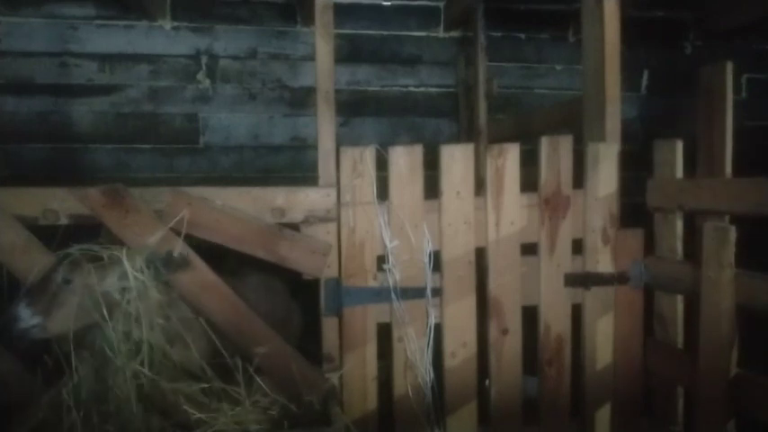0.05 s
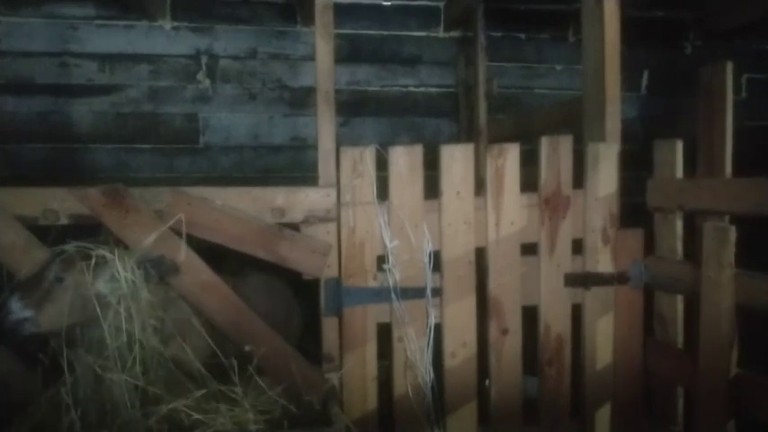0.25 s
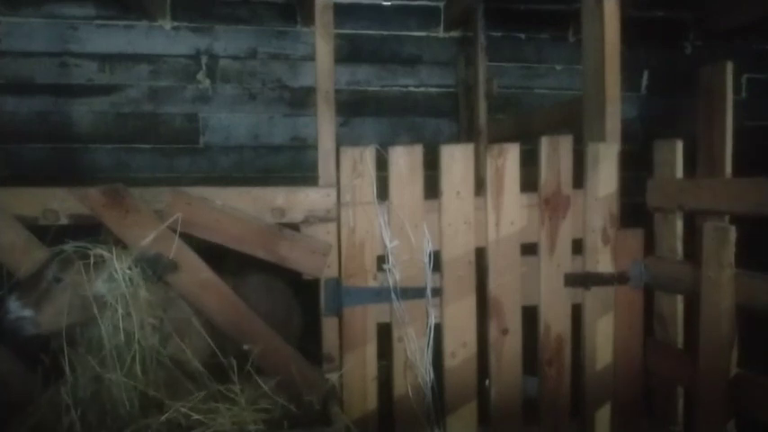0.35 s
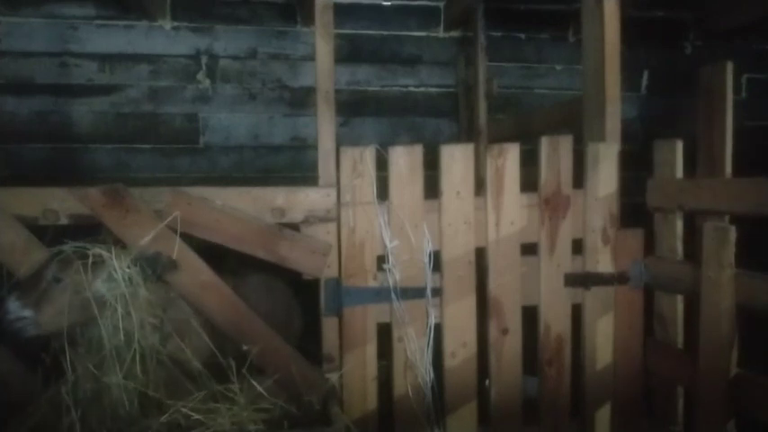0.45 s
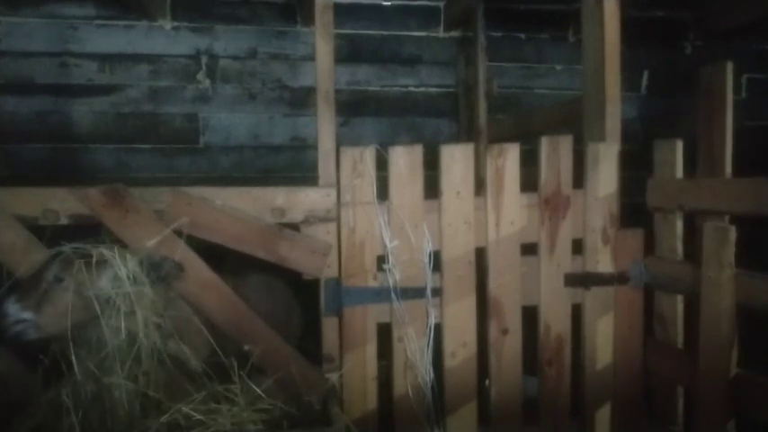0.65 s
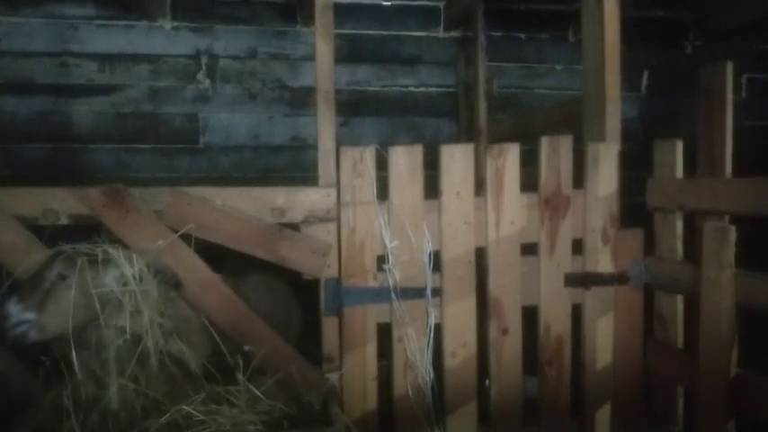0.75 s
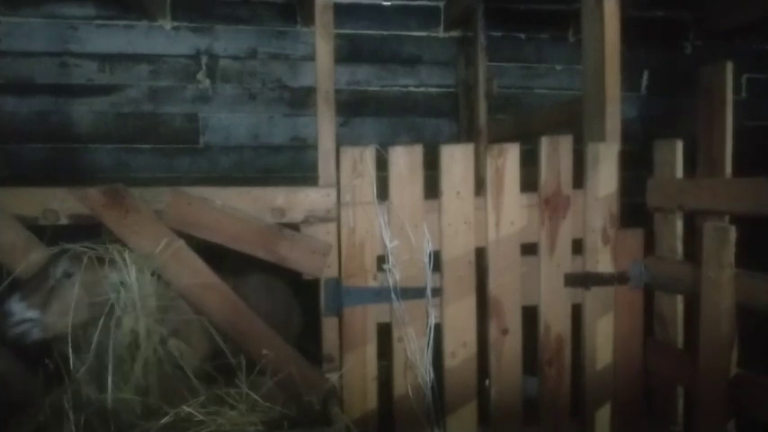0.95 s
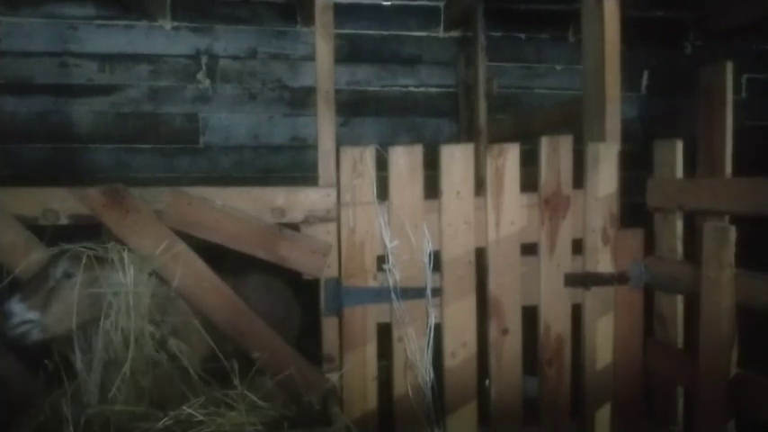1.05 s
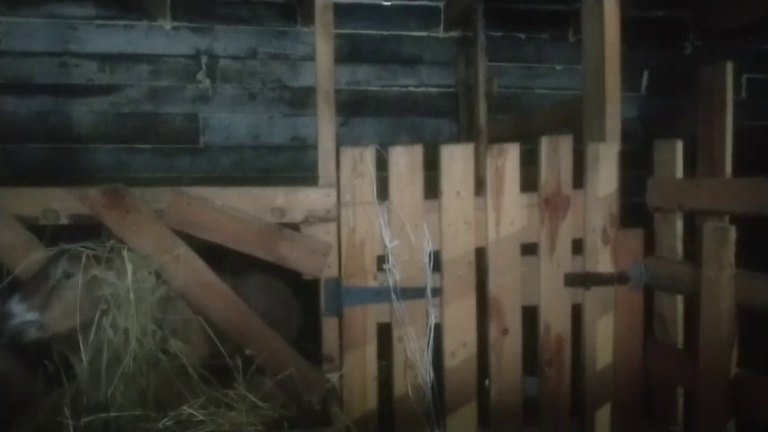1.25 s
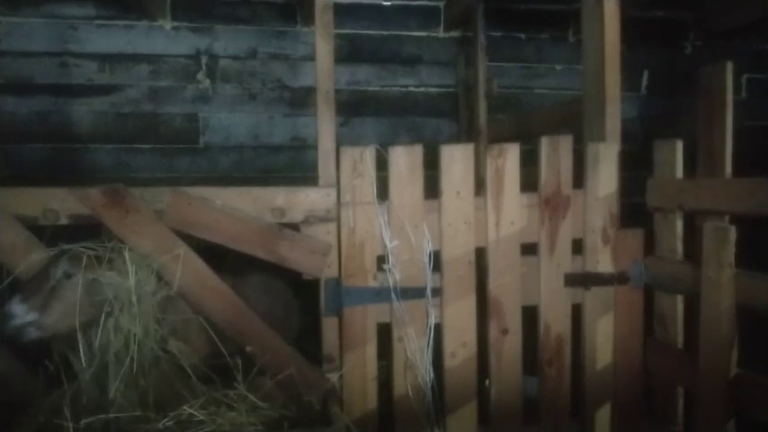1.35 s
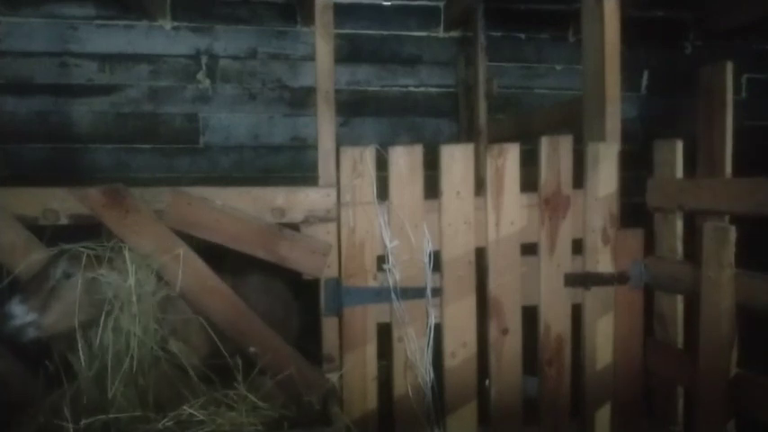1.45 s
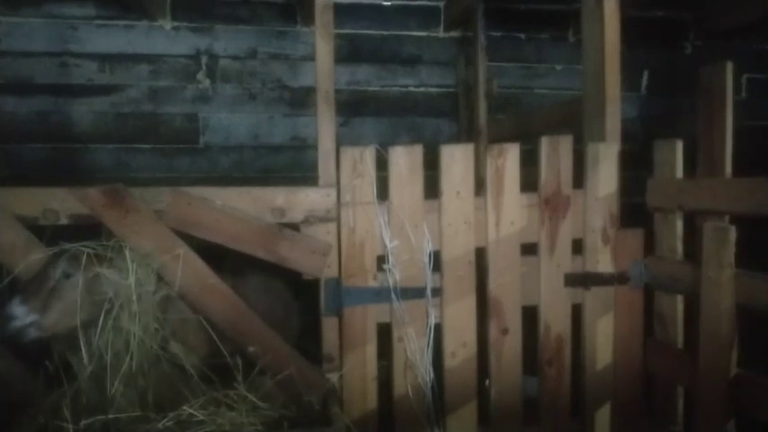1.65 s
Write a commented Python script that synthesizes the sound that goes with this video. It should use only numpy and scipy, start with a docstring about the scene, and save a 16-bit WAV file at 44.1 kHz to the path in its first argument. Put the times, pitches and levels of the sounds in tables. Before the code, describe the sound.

One long wavering goat bleat, with faint hay rustling in a wooden shed.

```python
"""A goat bleats in a shed

One long bleat starts as a closed-mouth grunt, jumps up in pitch, opens into a loud held call,
wavers and ends in a rough fall as the mouth closes. The voice is a stack of tones shaped by the
throat, mixed with hoarse breath, and the small wooden shed adds a short echo. Around it, made of
noise: a scuff, a snap of straw, a soft double bump, a hollow sound, rustling hay and faint hiss."""
import sys
import numpy as np
from scipy import signal
from scipy.fft import rfft, irfft, next_fast_len
from scipy.io import wavfile
from scipy.ndimage import map_coordinates

SR = 44100
rng = np.random.default_rng(int(sys.argv[2]) if len(sys.argv) > 2 else 0)


def dump_mix(stems):
    """Bounce the given channels to the path in sys.argv[1] as a 16-bit WAV at rate SR."""
    frames = np.atleast_2d(stems).T  # one column per channel
    limited = np.clip(frames, -1, 1)  # hard clip at full scale
    pcm = np.round(limited * 32767).astype(np.int16)
    wavfile.write(sys.argv[1], SR, pcm)


N = 74970
TIME = np.arange(N) / SR
LEFT_RIGHT = np.array([[.5], [-.5]])  # splits a difference between the two ears


def amp(db):
    """Turn decibels into a volume factor."""
    return 10 ** (np.asarray(db) / 20)


def unit(x):
    """Scale a sound to an average power of 1."""
    return x / np.sqrt(np.mean(x ** 2) + 1e-20)


def along(table, hz):
    """Look up a table's value at any frequency, on a log scale."""
    freqs, values = np.transpose(table)
    return np.interp(np.log(hz + 1), np.log(freqs + 1), values)


def curves(table):
    """Join the dots of a time table: one curve for each column after the time."""
    times, *columns = np.transpose(table)
    return [np.interp(TIME, times, column) for column in columns]


def wobble(rate):
    """A smooth curve through `rate` random values a second."""
    return map_coordinates(rng.standard_normal(4096), [TIME * rate + 2], mode="wrap")


def filtered(x, response):
    """Turn each frequency up or down by the factor response(hz)."""
    size = next_fast_len(N + SR // 2)
    return irfft(rfft(x, size) * response(np.fft.rfftfreq(size, 1 / SR)), size)[..., :N]


def panned(db):
    """Left and right volumes; negative dB moves the sound to the right."""
    gains = amp(LEFT_RIGHT * db)
    return gains / np.sqrt(np.mean(gains ** 2, axis=0))


def noise(colour):
    """Stereo noise shaped by a colour table; the ears are more alike in the bass than in the treble."""
    mid, side = filtered(rng.standard_normal((2, N)), lambda hz: amp(along(colour, hz)))
    side = filtered(side, lambda hz: (hz + 450) / (hz + 1800))
    return unit(np.array([mid + side, mid - side]))


def burst(colour, start_s, level_db, attack_s, fade_s, pan_db):
    """A short noise that swells, then dies away by 60 dB every fade_s."""
    age = np.maximum(TIME - start_s, 0)
    swell = 1 - np.exp(-age / attack_s)
    return swell * amp(level_db - 60 * age / fade_s) * panned(pan_db) * noise(colour)


# How loud the hay rustles (t/s, level/dB)
HAY_LEVEL = [(.1, -54), (.15, -61), (.22, -54), (.45, -53), (.6, -57.5), (1.3, -54.5), (1.6, -71.5)]
# Tone colours of the hay and the hiss (f/Hz, level/dB)
HAY_TONE = [(1000, 1), (3500, -6)]
HISS_TONE = [(25, -22), (80, -6), (250, -6.5), (1200, -26.5), (15500, -24.5)]

def background():
    """Hay rustles unevenly over a faint, steady, bass-heavy hiss."""
    hay_db, = curves(HAY_LEVEL)
    hay = amp(hay_db + 1.2 * wobble(150)) * noise(HAY_TONE)
    hiss = amp(-63) * noise(HISS_TONE)
    return panned(-2.5) * (hiss + hay)


# Tone colours of the four small noises (f/Hz, level/dB)
SCUFF_TONE = [(120, -22), (500, -13.5), (750, -3), (1400, -5), (2500, -10), (3400, -42), (7000, -55)]
STRAW_TONE = [(4000, -22.5), (8000, 1.5), (14000, 7)]
BUMP_TONE = [(25, -30), (45, -3), (100, -10.5), (400, -62.5)]
HOLLOW_TONE = [(200, -14.5), (690, -7), (760, 6.5), (830, -16.5), (3000, -41)]

def small_noises():
    """A scuff before the call, a snap of straw and two low bumps during it, a hollow sound after it."""
    scuff = burst(SCUFF_TONE, start_s=.046, level_db=-38.5, attack_s=.0048, fade_s=.23, pan_db=-9)
    snap = burst(STRAW_TONE, start_s=.455, level_db=-38.5, attack_s=.00088, fade_s=.092, pan_db=-1)
    bumps = sum(burst(BUMP_TONE, start_s, level_db, attack_s=.031, fade_s=.35, pan_db=-2.5)
                for start_s, level_db in [(1.025, -42), (1.11, -49)])
    hollow = burst(HOLLOW_TONE, start_s=1.618, level_db=-53.5, attack_s=.0078, fade_s=.29, pan_db=-19)
    return scuff + snap + bumps + hollow


# How long the echo takes to fade by 60 dB (f/Hz, t/s)
ECHO_FADE = [(150, 0.48), (700, 0.21), (2500, 0.33), (10000, 0.33)]
# Tone colour of the echo (f/Hz, level/dB)
ECHO_TONE = [(270, -6.5), (400, -1), (650, 0), (1050, -2.5), (2000, 0)]

def shed_echo(voice):
    """The plank walls answer with a short echo in which the bass lasts longest."""
    hz, t, spectrum = signal.stft(rng.standard_normal((2, SR // 2)), SR, nperseg=256)

    def fading_noise(fade_s):
        return signal.istft(spectrum * amp(-60 * t / fade_s), SR, nperseg=256)[1]

    tail = fading_noise(along(ECHO_FADE, hz)[:, None])
    tail /= np.linalg.norm(fading_noise(along(ECHO_FADE, 810))[0])  # gain of about 1 at 810 Hz
    delayed = np.pad(voice[1], (SR // 200, 0))  # the right channel, 5 ms late
    echo = signal.fftconvolve(delayed[None], tail, axes=1)[:, :N]
    return panned(-4) * filtered(echo, lambda hz: amp(along(ECHO_TONE, hz) - 6.5))


# Tone colours of the hoarse and the airy part of the breath (f/Hz, level/dB)
HOARSE_TONE = [(100, -27), (190, -8.5), (520, -9), (700, 7), (950, 1), (1200, -10.5), (2200, -10),
               (5000, -56.5)]
AIR_TONE = [(3000, -22.5), (5000, 1), (8000, 11), (10500, -9.5), (12300, 14), (15500, -23.5)]

def breath(phase, hoarse_gain, air_gain):
    """Breath noise that puffs once with every vibration of the voice."""
    puffs = unit(1 + .2 * np.cos(phase))
    hoarse = amp(-5) * hoarse_gain * noise(HOARSE_TONE)
    air = amp(-32) * air_gain * noise(AIR_TONE)
    return puffs * panned(-4) * (hoarse + air)


# Tone colour of the bleat's last rasp (f/Hz, level/dB)
CLOSING_TONE = [(80, -39), (180, 3.5), (380, 8), (1000, -34.5)]

def closing_rasp():
    """The voice breaks into a low rasp as the mouth closes."""
    return burst(CLOSING_TONE, start_s=1.394, level_db=-35.5, attack_s=.004, fade_s=.14, pan_db=-4)


# The two frequencies at which the throat rings (t/s, lower f/Hz, upper f/Hz)
THROAT_PEAKS = [(.2, 469, 810), (.25, 370, 760), (.3, 600, 740), (.35, 206, 795), (.43, 193, 816),
                (.49, 466, 977), (.6, 508, 997), (.68, 580, 1055), (.76, 649.3, 1064), (1.02, 657, 1050),
                (1.195, 639.7, 998.4), (1.235, 636, 1044), (1.26, 681.3, 955.6), (1.355, 664, 880),
                (1.42, 602, 860)]

def throat(hz):
    """The throat boosts tones near its two peaks, which rise as the mouth opens."""
    def peak(centre_hz, width_hz):
        return 1 / (1 + ((hz - centre_hz) / (width_hz / 2)) ** 2)

    lower_hz, upper_hz = curves(THROAT_PEAKS)
    peaks = peak(lower_hz, width_hz=195) + amp(3.8) * peak(upper_hz, width_hz=128)
    return peaks / (1 + (hz / 1190) ** 20)  # steep cut above 1190 Hz


# Colour of the high tones with the mouth open (f/Hz, level/dB)
OPEN_MOUTH_TONE = [(1050, -28), (1320, -10), (1580, -6), (1850, -1.5), (2130, 1), (2400, -2.5),
                   (2900, -9.5), (3170, -16), (3450, -11.5), (3720, -22), (4550, -20), (5200, -40),
                   (7000, -50)]

def mouth(hz):
    """The mouth shapes the high tones; its peaks and valleys flatten as it shuts."""
    shut_hz, open_hz, shut_contrast = 800, 1060, .65
    _, upper_hz = curves(THROAT_PEAKS)
    opening = np.clip((upper_hz - shut_hz) / (open_hz - shut_hz), 0, 1)
    contrast = shut_contrast + (1 - shut_contrast) * opening
    return amp(along(OPEN_MOUTH_TONE, hz) * contrast)


# How much louder the voice is on the left than on the right (f/Hz, level/dB)
VOICE_PAN = [(300, -3.5), (530, 1), (790, -3), (1050, -11.5), (1500, -5)]
# How far the wave at the left ear runs ahead (f/Hz, phase/rad)
LEFT_LEAD = [(300, 0.055), (790, 1.35), (1050, 1.65), (2000, 2.19)]

def harmonics(pitch, phase, multiples, shape, waver_db):
    """Tones at whole multiples of the pitch, weighted by shape(hz), each wavering in loudness."""
    tones, power = np.zeros((2, N)), 1e-12
    for k in multiples:
        hz = k * pitch
        gain = shape(hz)
        power += gain ** 2
        waver = amp(waver_db * np.array([wobble(28), wobble(28)]))
        wave = np.sin(k * phase + LEFT_RIGHT * along(LEFT_LEAD, hz))
        tones += gain * waver * panned(along(VOICE_PAN, hz)) * wave
    return tones * np.sqrt(2 / power)


# The tune of the bleat (t/s, f/Hz)
BLEAT_PITCH = [(.18, 183.1), (.225, 175.2), (.272, 177.4), (.293, 197.7), (.305, 238.2), (.335, 235.5),
               (.385, 242.2), (.5, 255.7), (.75, 266.9), (1.01, 263.3), (1.145, 258.3), (1.185, 265.7),
               (1.23, 257.9), (1.255, 250.9), (1.3, 252.1), (1.345, 241.3), (1.39, 225.6), (1.42, 200.2)]
# How rough the voice is (t/s, roughness/0-1)
BLEAT_ROUGHNESS = [(.23, .16), (.27, .5), (.305, .5), (.34, .16), (.6, .06), (1.14, .11), (1.23, .06),
                   (1.255, .25), (1.29, .1), (1.37, .25), (1.42, .5)]
# How the voice's parts swell and fade before mixing (t/s, hum level/dB, call level/dB, treble level/dB)
BLEAT_LEVELS = [(.18, -43, -55, -75), (.205, -40, -48, -62), (.228, -27, -44.5, -53), (.275, -30, -49, -61),
                (.296, -49, -49, -63), (.34, -32, -49, -48), (.385, -39.5, -42.5, -51),
                (.435, -31.5, -44, -48), (.508, -42, -42, -49), (.565, -38.5, -31, -40),
                (.68, -42, -24, -35), (.79, -41, -23.5, -33.5), (.92, -40, -21, -34),
                (1.02, -37.5, -19, -33.5), (1.065, -46, -25, -38), (1.125, -35.5, -21.5, -34),
                (1.16, -50, -32, -38), (1.195, -40, -23, -38), (1.232, -35.5, -20, -34.5),
                (1.275, -51, -29, -41.5), (1.325, -35.5, -25.5, -40), (1.356, -42, -20.5, -41),
                (1.368, -55, -28.5, -49), (1.39, -50, -26, -55), (1.42, -47, -35.5, -67)]

def goat():
    """One vibration makes a low hum, an open call and a bright treble; roughness makes them tremble."""
    start_s, end_s, attack_s, release_s = .178, 1.445, .004, .035
    pitch, = curves(BLEAT_PITCH)
    roughness, = curves(BLEAT_ROUGHNESS)
    hum_gain, call_gain, treble_gain = amp(curves(BLEAT_LEVELS))
    shaky_pitch = pitch * (1 + .038 * roughness * wobble(170))
    phase = 2 * np.pi * np.cumsum(shaky_pitch) / SR
    hum = amp(-2) * hum_gain * harmonics(pitch, phase, [1], np.ones_like, waver_db=1.3)
    call = amp(-.5) * call_gain * harmonics(pitch, phase, range(2, 7), throat, waver_db=1.3)
    treble = amp(-1.5) * treble_gain * harmonics(pitch, phase, range(5, 23), mouth, waver_db=3)
    breathing = breath(phase, roughness * call_gain, treble_gain)
    rasp = closing_rasp()
    flutter = amp(4.5 * roughness * wobble(170))
    fade_in = np.clip((TIME - start_s) / attack_s, 0, 1)
    fade_out = np.clip((end_s - TIME) / release_s, 0, 1)
    return fade_in * fade_out * (hum + flutter * (call + treble + breathing)) + rasp


def scene():
    """The goat in its shed, with the small noises around it."""
    voice = goat()
    return voice + shed_echo(voice) + small_noises() + background()


def record(dry):
    """Cut away the very highest treble."""
    return filtered(dry, lambda hz: hz < 15800)


dry = scene()
out = record(dry)
dump_mix(out)
```